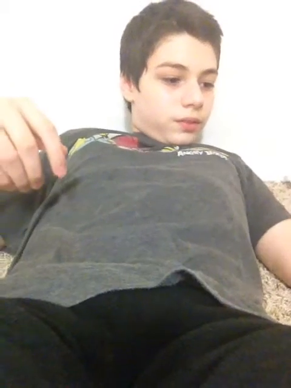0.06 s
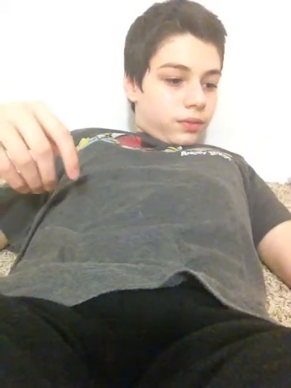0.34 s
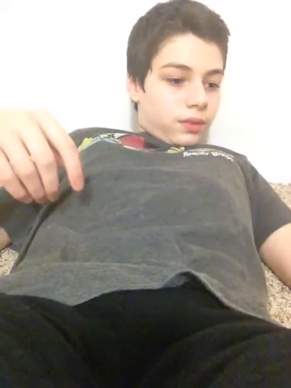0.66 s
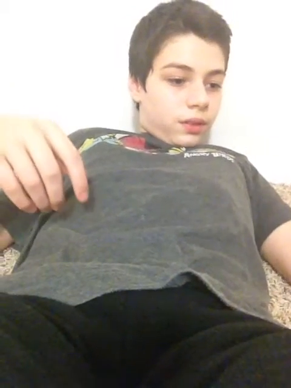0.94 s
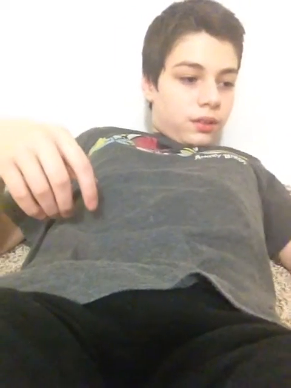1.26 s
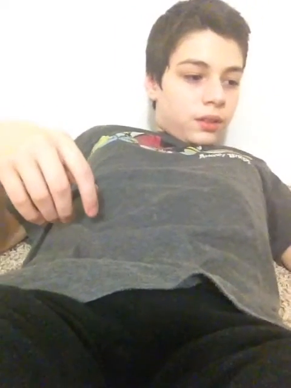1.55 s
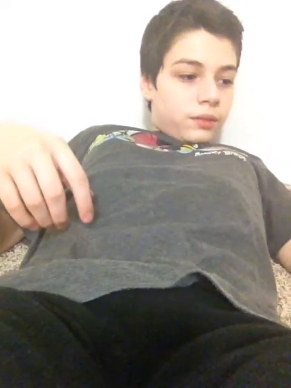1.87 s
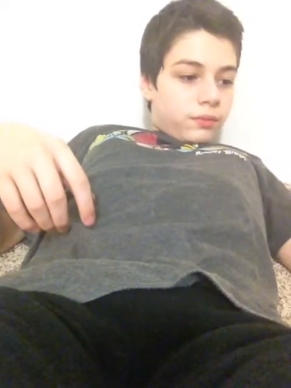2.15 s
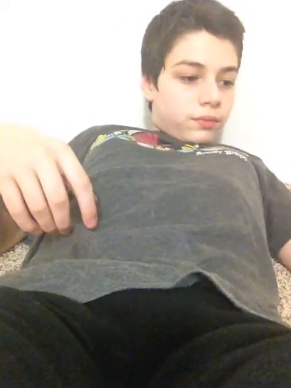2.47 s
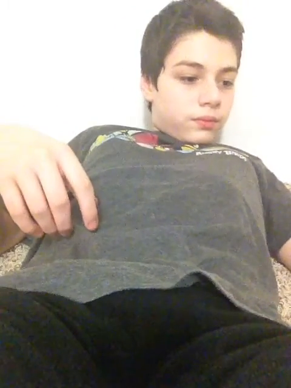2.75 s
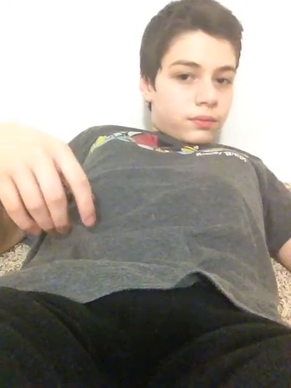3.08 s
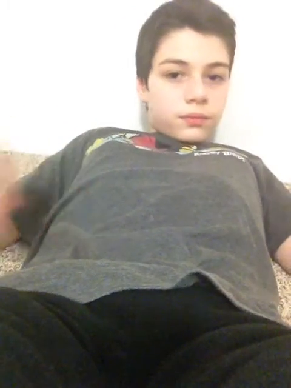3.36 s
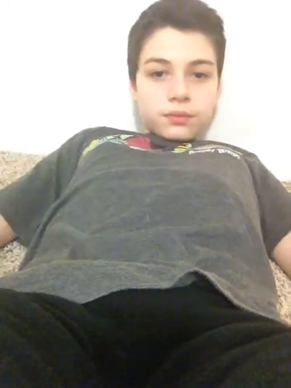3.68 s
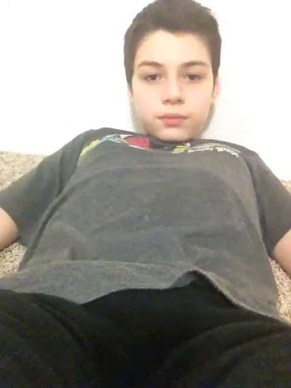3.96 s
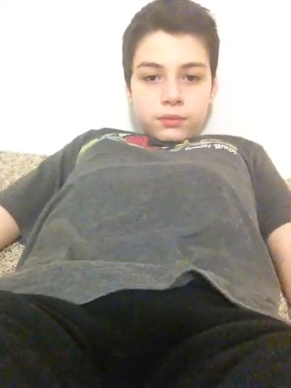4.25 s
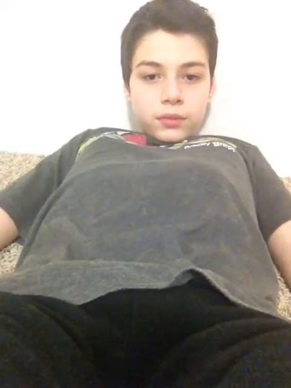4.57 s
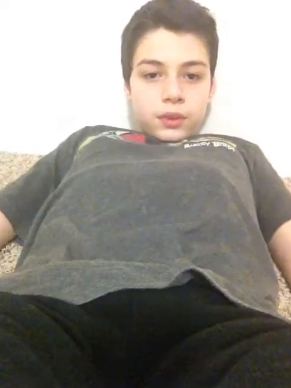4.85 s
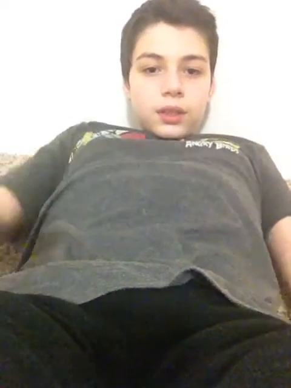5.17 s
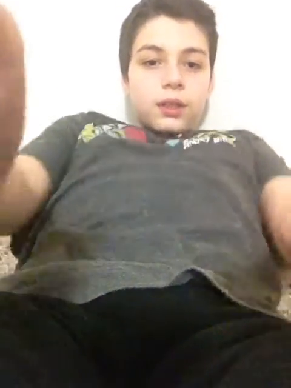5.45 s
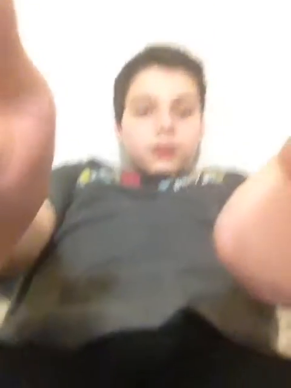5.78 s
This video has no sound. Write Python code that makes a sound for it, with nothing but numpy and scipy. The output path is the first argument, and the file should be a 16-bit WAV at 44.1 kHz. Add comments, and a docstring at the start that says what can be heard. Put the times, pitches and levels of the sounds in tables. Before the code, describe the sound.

Small plastic objects click, knock and drag on a carpet near the microphone, among soft cloth rustles and short lulls.

```python
"""In a small, quiet room a hand fiddles with small plastic things beside a phone lying on a carpet.
First a clack, then a dull bump that reaches the phone through the floor and leaves a hollow ring.
Sleeve and shirt rustle; from 1.3 s the plastic clicks, clatters and is dragged a little way.
After a lull come sparser knocks from 3.8 s, with a very faint, thin whistle among them.
At the end cloth and skin brush softly as the hands reach for the phone."""
import sys
import numpy as np
from scipy import signal
from scipy.fft import rfft
from scipy.io import wavfile
from scipy.ndimage import uniform_filter1d

SR = 44100
rng = np.random.default_rng(int(sys.argv[2]) if len(sys.argv) > 2 else 0)


def wav_out(sig):
    """Save sig, one row per channel (or a flat mono array), as 16-bit PCM at SR to the path in sys.argv[1]."""
    wavfile.write(sys.argv[1], SR, np.round(np.clip(np.atleast_2d(sig).T, -1, 1) * 32767).astype(np.int16))


N = 265482


def gain_of(db):
    """Decibels to amplitude."""
    return 10 ** (np.asarray(db) / 20)


def unit_rms(x):
    """Normalises to rms 1."""
    return x / np.sqrt(np.mean(x ** 2) + 1e-20)


def curve_at(points, hz):
    """Reads a curve on a log-frequency axis."""
    f, value = np.transpose(points)
    return np.interp(np.log(hz + 1), np.log(f + 1), value)


def bell(hz, centre, width):
    """Shape of one resonance, 1 at its centre."""
    return 1 / (1 + (2 * (hz - centre) / width) ** 2)


def add(mix, start_s, sound):
    """Drops a sound into the mix."""
    part = mix[max(round(start_s * SR), 0):][:len(sound)]
    part += sound[:len(part)]


def eq(x, db_at, size=16384):
    """Minimum-phase EQ with the gain db_at(Hz): peaks ring after the blow, never before."""
    log_gain = np.log(gain_of(db_at(abs(np.fft.fftfreq(size, 1 / SR)))))
    response = np.exp(np.conj(signal.hilbert(log_gain)))
    taps = np.fft.ifft(response).real[:size // 2]
    return signal.fftconvolve(x, taps)[:len(x)]


def wander(rate_hz):
    """Random modulator of rms 1."""
    count = int(N / SR * rate_hz) + 2
    targets = rng.standard_normal(N)[:count]
    return unit_rms(np.interp(np.arange(N) / SR * rate_hz, np.arange(count), targets))


# Tone of the background bed: (frequency [Hz], relative density [dB])
HUSH_EQ = [(20, -48), (40, -39), (65, -26), (90, -22), (125, -9), (175, -2), (290, -4.5), (460, -6.5),
           (850, -8), (1300, -11.5), (3000, -13.5), (6500, -18.5), (10900, -23), (15300, -17)]

def room_tone(level_db=-68.5):
    """A faint, steady bed of quiet room and microphone hiss."""
    hush = eq(rng.standard_normal(N), lambda hz: curve_at(HUSH_EQ, hz))
    return gain_of(level_db) * unit_rms(hush)


# Short reverb of the small room: (frequency [Hz], time to fall 60 dB [s])
ROOM_DECAY = [(100, 0.37), (260, 0.11), (700, 0.19), (1800, 0.18), (4800, 0.19), (14000, 0.12)]

def room_tail(size=16384, build_s=0.0011):
    """Dense reflections of energy 1, each band dying at its own speed."""
    hz, t, bands = signal.stft(rng.standard_normal(size), SR, nperseg=256)
    decay = gain_of(-60 * t / curve_at(ROOM_DECAY, hz)[:, None])
    tail = signal.istft(bands * decay, SR, nperseg=256)[1][:size]
    tail *= 1 - np.exp(-np.arange(size) / SR / build_s)
    return tail / np.linalg.norm(tail)


# Broad tone shared by all contact sounds: (frequency [Hz], gain [dB])
CONTACT_EQ = [(30, -29), (58, -28), (76, -5), (150, -7), (300, -3.5), (600, -2), (1000, -4.5), (1400, -4),
              (2300, -2), (3600, 0), (7000, 1.5), (11000, -4), (15500, -11.5)]
# Resonances and hollows of plastic and phone: (frequency [Hz], width [Hz], gain [dB])
BODY_MODES = [(82, 10, 0), (180, 33, -5.5), (204, 19, 2), (253.7, 44, 6.5), (311, 20, -3), (356, 22, -0.5),
              (389, 37, 7.5), (444, 6, 3), (507.5, 34, 6), (668, 30, 7), (716, 25, 5.5), (820, 19, 3),
              (896, 53, 2), (1003, 58, 6), (1091.5, 22, 8.5), (1194, 41, 0), (1387, 26, 2), (1513, 30, 3),
              (1610, 55, -2), (1920, 49, 5.5), (2110, 65, 1), (2710, 98, -1), (3070, 31, 6.5),
              (3270, 46, 2), (3730, 170, -1.5), (4620, 960, 2), (5600, 36, 5), (6440, 188, 1),
              (7640, 93, -4)]

def body_db(hz):
    """The resonating plastic and phone colour every rub and knock."""
    return curve_at(CONTACT_EQ, hz) + sum(db * bell(hz, f, width) for f, width, db in BODY_MODES)


def pressure(strokes, swell_share=0.45, fade_share=0.66):
    """Each stroke swells and lets go at its own level; overlapping strokes add in power."""
    power = np.zeros(N)
    for start_s, length_s, db in strokes:
        progress = np.arange(0, length_s, 1 / SR) / length_s
        ramp = np.clip(np.minimum(progress / swell_share, (1 - progress) / fade_share), 0, 1)
        add(power, start_s, (gain_of(db) * np.sin(np.pi / 2 * ramp)) ** 2)
    return np.sqrt(power)


def friction(tone, strokes, slips_per_s, spread_db, waver_db, wet_db):
    """Many tiny slips of uneven size under a stroke whose pressure wavers."""
    sizes = rng.standard_normal(N) * gain_of(spread_db * np.minimum(rng.exponential(1, N), 4))
    slipping = rng.random(N) < slips_per_s / SR
    slips = sizes * slipping * gain_of(waver_db * wander(60))
    reverb = gain_of(wet_db) * signal.fftconvolve(slips, room_tail())[:N]
    texture = eq(slips + reverb, lambda hz: curve_at(tone, hz) + body_db(hz))
    return pressure(strokes) * unit_rms(texture)


# Dark drag, papery rustle and airy fizz: (frequency [Hz], relative density [dB])
DRAG_EQ = [(40, -17), (80, -5.5), (180, -12), (290, -0.5), (520, 0), (800, -2.5), (1300, -17), (2000, -13),
           (4000, -36)]
RUSTLE_EQ = [(200, -34), (700, 2), (1100, 5.5), (1550, 0.5), (2100, 3.5), (2700, -3), (3800, -6),
             (6000, -17), (15000, -19.5)]
FIZZ_EQ = [(1000, -41), (3500, -1), (5500, -7.5), (8000, -5.5), (12000, -1), (15500, 2.5)]
# Moves of hand and sleeve: (time [s], length [s], drag level [dB], rustle level [dB], fizz level [dB])
HAND_MOVES = [(0, 0.049, -64, -58.5, -71), (.1, 0.23, -64, -72, -71), (0.254, 0.15, -76, -65, -60),
              (0.384, 0.19, -63.5, -59, -67), (0.563, 0.23, -65, -58, -63.5), (1.068, 0.34, -72, -70, -76),
              (1.28, 0.21, -75.5, -64.5, -68.5), (1.544, 0.85, -67.5, -67, -80),
              (1.979, 0.14, -56.5, -51.5, -83), (2.252, 0.19, -66.5, -68, -75),
              (2.469, 0.29, -53.5, -62, -67.5), (2.594, 0.1, -48, -50, -60),
              (2.656, 0.095, -77, -51, -54.5), (2.694, 0.16, -50, -53, -74), (2.793, 0.25, -73, -72.5, -73),
              (3.826, 0.74, -73.5, -71, -91), (3.899, 0.035, -64, -56, -64), (4.247, 0.53, -69, -73.5, -89),
              (4.87, 0.35, -69.5, -71.5, -75), (5.464, 0.32, -88, -77, -67.5),
              (5.693, 0.45, -72, -70.5, -67.5)]

def rubbing():
    """Plastic drags over the carpet, cloth rustles as it folds, and skin fizzes across the fibres."""
    start_s, length_s, *levels_db = np.transpose(HAND_MOVES)
    drags, folds, brushes = (zip(start_s, length_s, db) for db in levels_db)
    drag = friction(DRAG_EQ, drags, slips_per_s=1300, spread_db=0.5, waver_db=2.0, wet_db=-0.5)
    rustle = friction(RUSTLE_EQ, folds, slips_per_s=3000, spread_db=5.0, waver_db=4.0, wet_db=4.5)
    fizz = friction(FIZZ_EQ, brushes, slips_per_s=7000, spread_db=3.0, waver_db=0.5, wet_db=1.0)
    return drag + rustle + fizz


def impact(tail_db, attack_s, crack_s=0.0078):
    """A crack of a few milliseconds and its room tail, flattened to equal energy in all bands."""
    tail = room_tail()
    t = np.arange(len(tail)) / SR
    crack = rng.standard_normal(len(t)) * np.exp(-t / crack_s)
    attack = 1 - np.exp(-t / attack_s)
    blow = (crack / np.linalg.norm(crack) + gain_of(tail_db) * tail) * attack
    band_db = 10 * np.log10(uniform_filter1d(abs(rfft(blow)) ** 2, size=45) + 1e-9)
    return eq(blow, lambda hz: -np.interp(hz, np.fft.rfftfreq(len(t), 1 / SR), band_db))


def case_ripple(depth_db=4.0, spacing_hz=170):
    """Each spot on a hollow case favours some of its upper modes: (frequency [Hz], gain [dB])."""
    hz = np.arange(1000, SR / 2, spacing_hz)
    lift_db = depth_db * rng.standard_normal(1024)[:len(hz)]
    return np.transpose([hz, lift_db * (hz > hz[0])])


def strike(cues, tone, ring_db, pivot_hz=1000, top_hz=7000, ring_q=4.4):
    """Knocks on the plastic: weight lifts the bass, hardness the treble, and each has its own ring."""
    hits = np.zeros(N)
    tone_hz, tone_db = np.transpose(tone)
    octaves = np.log2(np.minimum(tone_hz, top_hz) / pivot_hz)
    for start_s, db, weight, hardness, tail_db, ring_hz in cues:
        tilt_db = abs(octaves) * np.where(octaves < 0, weight, hardness)
        tilted = np.transpose([tone_hz, tone_db + tilt_db])
        ripple = case_ripple()
        dullness_db = curve_at(tilted, 400) - curve_at(tilted, top_hz)
        attack_s = np.interp(dullness_db, [25, 45], [0.00031, 0.00083])  # duller hits start more softly
        hit = eq(impact(tail_db, attack_s),
                 lambda hz: curve_at(tilted, hz) + curve_at(ripple, hz)
                 + ring_db * bell(hz, ring_hz, ring_hz / ring_q))
        add(hits, start_s, gain_of(db) * hit)
    return eq(hits, body_db)


# Mid-forward tone of a clack: (frequency [Hz], gain [dB])
CLACK_EQ = [(50, -16), (120, -15.5), (400, -4), (1000, 0), (2400, -7.5), (7000, -29.5)]
# Clacks: (time [s], level before EQ [dB], weight [dB/oct], hardness [dB/oct], tail [dB], ring [Hz])
CLACK_CUES = [(.044, 3.5, -4.5, 0, -5, 660), (.33, -6.5, 4.5, 1.5, 7, 536),
              (1.476, 12.5, -3, 1.35, -10, 2100), (1.488, 8, -2.5, -4, -2, 1240),
              (1.571, -6.5, -1, -0.5, -3, 900), (1.894, -12, 0.2, -5.5, -2, 686),
              (2.039, 10, 0.5, 1, 0, 690), (2.315, 0.5, 4.5, 0.1, -5, 277), (3.838, -20.5, 1, 0, -2, 380),
              (3.918, -9.5, 1, 1, -4.5, 910), (4.262, -3, -1.5, -5.5, -5.5, 1240),
              (4.855, -18, 3.5, -1.5, 1, 940), (4.969, -14.5, 2, 1.5, -7, 700),
              (4.99, -16, 1.5, -0.5, 0, 696)]

def clacks():
    """Plastic is set down or struck on plastic."""
    return strike(CLACK_CUES, CLACK_EQ, ring_db=7.0)


# Bass-heavy tone of a bump: (frequency [Hz], gain [dB])
BUMP_EQ = [(50, -1.5), (120, 7.5), (400, 10.5), (1000, -2.5), (2400, -11), (7000, -30.5)]
# Bumps: (time [s], level before EQ [dB], weight [dB/oct], hardness [dB/oct], tail [dB], ring [Hz])
BUMP_CUES = [(.076, 5.5, 2, 5, -4, 145), (.14, -10, -0.5, -1, 4, 653), (2.428, -8.5, -3.5, -0.5, -9, 294),
             (2.452, -14.5, -3.5, -3, -8, 544), (2.561, -24, -2.5, 4, 2, 547), (2.873, -27, 1, 4, -7, 320),
             (3.961, -17.5, -6, -3, -4, 940), (4.254, -9, -3, -3, -11, 202),
             (4.269, 1.5, -3, -6.5, -19.5, 235), (5.705, -41, 5, 3, -4, 172)]

def bumps():
    """Padded blows reach the phone through the floor."""
    return strike(BUMP_CUES, BUMP_EQ, ring_db=10.0)


def hollow_ring(hz=200, level_db=-36, t60_s=0.37):
    """One low mode outlasts the first and heaviest bump, which struck it."""
    age_s = np.maximum(np.arange(N) / SR - BUMP_CUES[0][0], 0)
    return gain_of(level_db - 60 * age_s / t60_s) * np.sin(2 * np.pi * hz * age_s)


# Bright tone of a tick: (frequency [Hz], gain [dB])
TICK_EQ = [(50, -14), (120, -16), (400, -7), (1000, -6.5), (2400, -2.5), (7000, -13.5)]
# Ticks: (time [s], level before EQ [dB], weight [dB/oct], hardness [dB/oct], tail [dB], ring [Hz])
TICK_CUES = [(.097, -5.5, 6, 2.5, 1, 1770), (.111, -8.5, 2, 2.5, -2.5, 1910),
             (.361, -16, 3.5, -0.5, -8, 820), (1.305, -17.5, -9, -3.5, -17, 2730),
             (1.535, -10.5, -8, -0.5, -3, 4550), (2.057, 6.5, 3.5, -3, -1.5, 265),
             (2.083, -2.5, -3.5, -2.1, 11, 4460), (2.333, -5.5, 1, -2.8, -4.5, 4580),
             (2.632, -9, 2.5, -1, 6, 1900), (2.743, 1, -5, -1.5, 11, 398), (2.753, -4.5, 1.5, 2, -13, 5730),
             (2.757, -10.5, 6, 3.5, -3.5, 830), (2.809, -15.5, 0, -1, 2, 2000)]

def ticks():
    """The plastic rebounds and clatters lightly."""
    return strike(TICK_CUES, TICK_EQ, ring_db=8.5)


# Glide and fades of the whistle: (time [s], pitch [Hz], level [dB])
WHISTLE_GLIDE = [(4.3, 8000, -100), (4.37, 8900, -81), (4.43, 10300, -83), (4.47, 10300, -100),
                 (4.56, 10440, -81), (4.62, 10100, -83), (4.68, 9500, -100)]

def whistle(waver=0.016, flutter_db=4.5):
    """A very faint, thin, unsteady tone glides up and sinks again."""
    times, hz, db = np.transpose(WHISTLE_GLIDE)
    t = np.arange(N) / SR
    pitch_hz = np.interp(t, times, hz) * (1 + waver * wander(400))
    level = gain_of(np.interp(t, times, db) + flutter_db * wander(70))
    gate = (t > times[0]) & (t < times[-1])
    return gate * level * np.sin(2 * np.pi * np.cumsum(pitch_hz) / SR)


def scene():
    """Knocks, rubbing, whistle and room tone meet at one microphone."""
    knocks = clacks() + ticks() + bumps() + hollow_ring()
    return (knocks + rubbing() + whistle() + room_tone())[None]


def record(dry, cutoff_hz=15450):
    """The phone's steep high cut."""
    low_pass = signal.firwin(511, cutoff_hz, window=("kaiser", 9), fs=SR)
    return signal.oaconvolve(dry, low_pass[None], "same")


dry = scene()
out = record(dry)
wav_out(out)
```